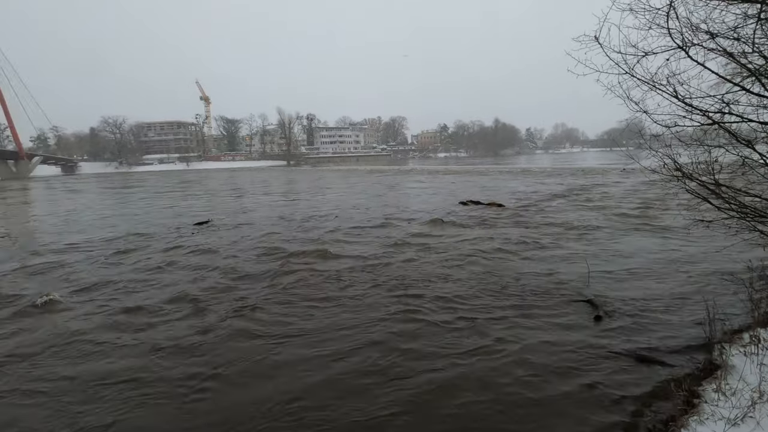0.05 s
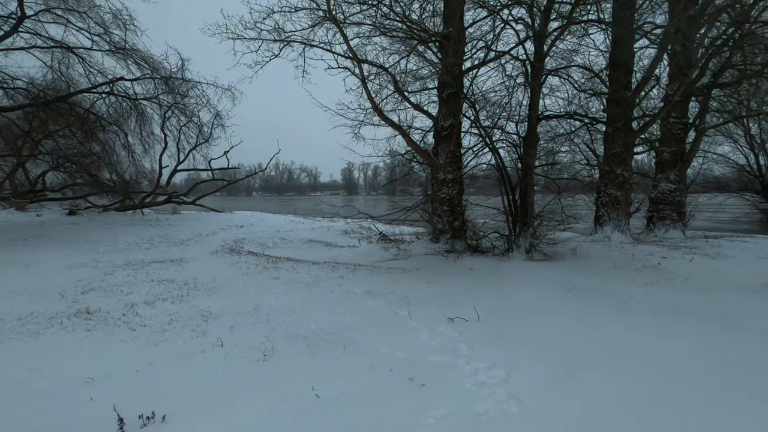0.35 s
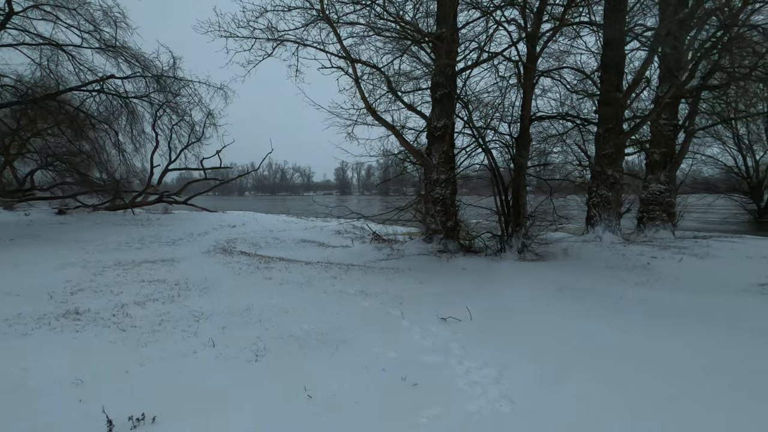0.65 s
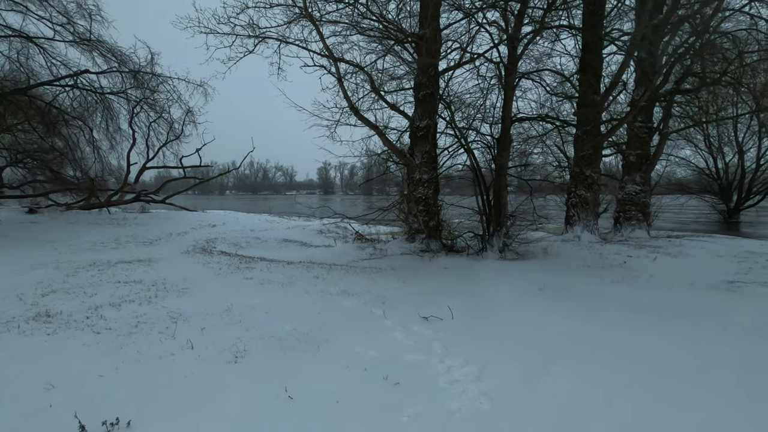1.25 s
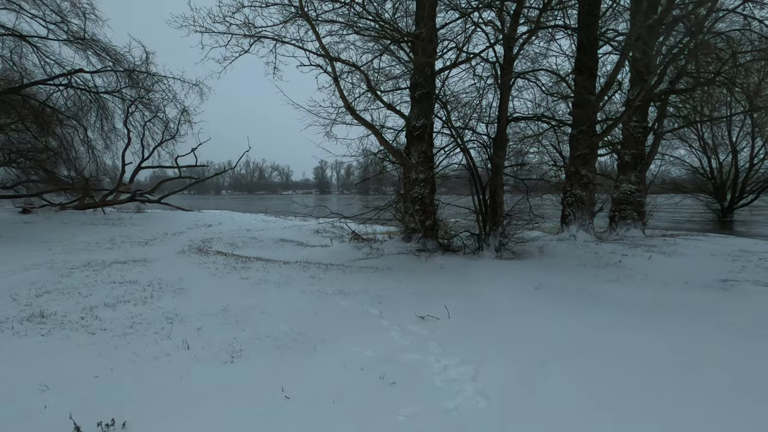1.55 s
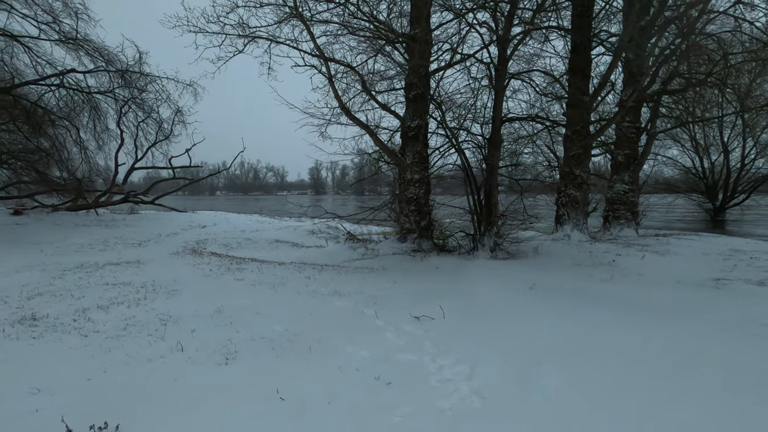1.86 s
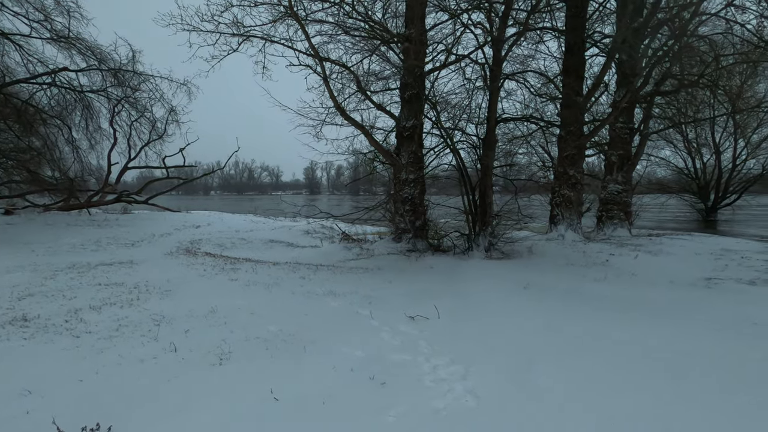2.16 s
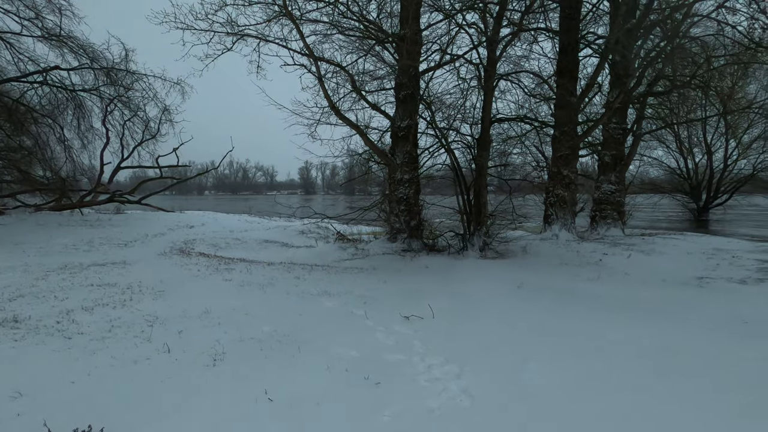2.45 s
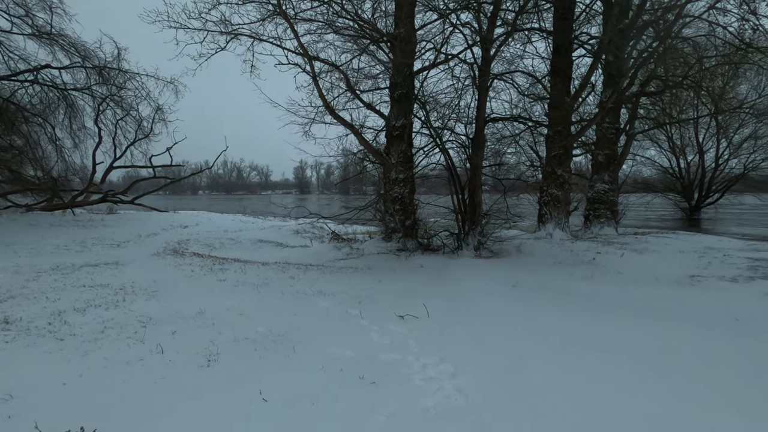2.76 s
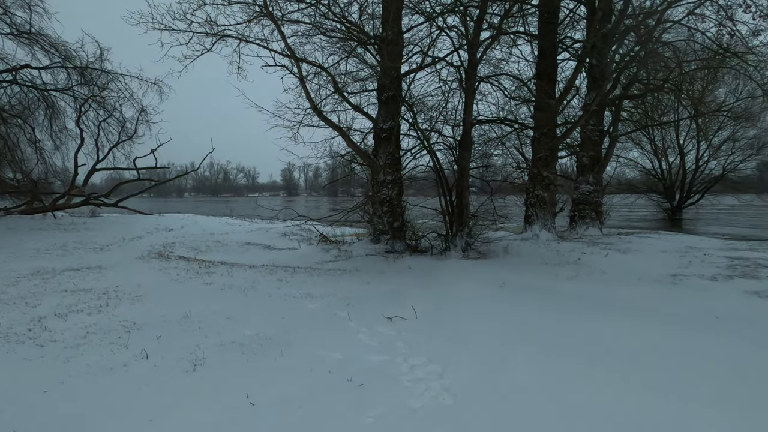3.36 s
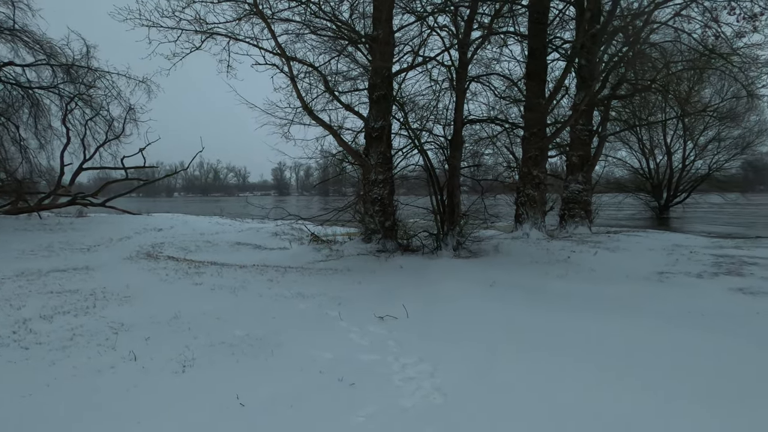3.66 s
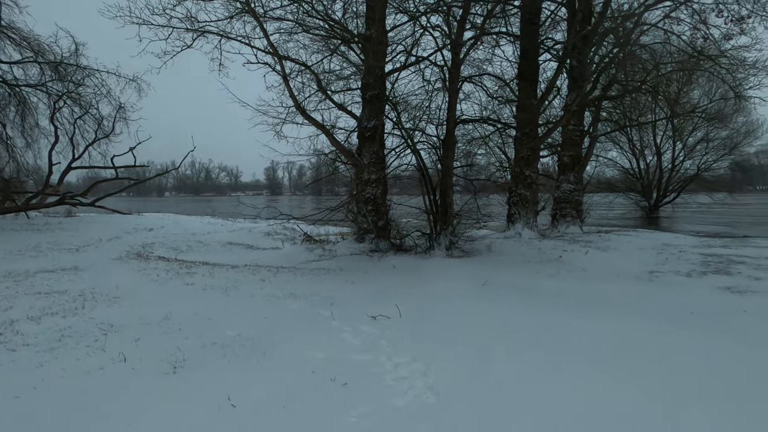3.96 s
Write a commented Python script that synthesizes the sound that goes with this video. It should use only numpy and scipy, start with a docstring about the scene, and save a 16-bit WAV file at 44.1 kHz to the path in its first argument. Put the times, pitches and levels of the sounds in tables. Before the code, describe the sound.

Wind rumbles and thumps on the microphone in an open snowy park. A fluttering gust builds, eases midway, then buffets again, while a distant river hisses faintly underneath with a few tiny ticks and rustles.

```python
"""A snowy park beside a river, the microphone out in gusty wind.
For the first instant water rushes close by; then it is a far hiss under the wind's rumble.
Eddies thump the microphone and flutter faster as a gust builds after one second. The wind eases
around two seconds and buffets again through the last third. Faint ticks and rustles come and go."""
import sys
import numpy as np
from scipy import signal
from scipy.fft import rfft, irfft
from scipy.io import wavfile
from scipy.ndimage import map_coordinates

SR = 44100
rng = np.random.default_rng(int(sys.argv[2]) if len(sys.argv) > 2 else 0)


def output_pcm(signal):
    """Save a mono or channel-first signal as 16-bit PCM at the path in sys.argv[1].

    Samples are clipped to [-1, 1] before scaling.
    """
    pcm = np.clip(np.atleast_2d(signal).T, -1, 1) * 32767
    wavfile.write(sys.argv[1], SR, np.round(pcm).astype(np.int16))


N = 176400
T = np.arange(N) / SR

# Wind pressure on the microphone. Each row: time in seconds, relative level in dB.
RUMBLE_LEVEL = [(0.0, -62), (0.03, -32.5), (0.09, -42), (0.14, -22), (0.4, -28), (0.51, -26), (0.58, -30),
                (0.66, -27.5), (0.84, -28.5), (0.98, -23), (1.27, -21.5), (1.34, -26.5), (1.51, -17),
                (1.56, -27), (1.76, -28), (1.91, -35.5), (2.03, -30.5), (2.1, -34), (2.27, -29.5),
                (2.37, -31.5), (2.42, -39), (2.51, -29), (2.62, -30), (2.69, -19.5), (2.93, -21.5),
                (3.1, -18.5), (3.18, -19), (3.23, -25), (3.28, -19), (3.45, -25.5), (3.56, -18.5),
                (3.77, -20), (4.0, -29)]
# Gust strength, heard as flutter. Each row: time in seconds, relative level in dB.
GUST_LEVEL = [(0, -58), (.12, -52), (.135, -39.5), (.24, -38), (.41, -42), (.46, -54), (.56, -46.5),
              (.63, -52), (.72, -43.5), (.78, -49), (.9, -37.5), (1.03, -44.5), (1.06, -33), (1.2, -31.5),
              (1.28, -34), (1.34, -45), (1.41, -35), (1.46, -34), (1.55, -46), (1.7, -49), (1.88, -58),
              (1.97, -45), (2.09, -52), (2.24, -44), (2.42, -52), (2.52, -46), (2.63, -49.5), (2.7, -40),
              (2.9, -33.5), (2.93, -44.5), (3.0, -45), (3.06, -36.5), (3.21, -50), (3.28, -41), (3.44, -48),
              (3.6, -36), (3.7, -40), (3.83, -43), (4, -51.5)]
# Bursts of churning air. Each row: middle and length in seconds, relative level in dB, pitch in Hz.
BUFFETS = [(.228, 0.065, -27, 185), (0.717, .07, -34, 166), (0.896, 0.032, -26.5, 225),
           (1.057, 0.022, -24.5, 344), (1.094, 0.054, -21.5, 264), (1.16, 0.032, -25.5, 422),
           (1.185, 0.034, -27.5, 540), (1.214, 0.023, -27, 674), (1.274, 0.033, -18, 130),
           (1.41, 0.12, -22, 179), (1.455, 0.03, -28.5, 480), (1.498, .035, -28, 210),
           (1.645, 0.033, -28.5, 141), (1.779, 0.024, -26, 85), (1.96, 0.059, -27.5, 116),
           (2.045, .06, -34, 104), (2.154, 0.056, -31, 125), (2.37, 0.038, -32.5, 128),
           (2.5, 0.056, -32, 160), (2.695, 0.035, -32, 250), (2.759, 0.12, -23.5, 171),
           (2.837, 0.081, -22.5, 245), (2.893, 0.041, -17.5, 252), (3.075, 0.08, -28, 158),
           (3.155, .03, -23.5, 175), (3.308, 0.084, -28, 114), (3.487, 0.019, -30.5, 200),
           (3.522, 0.042, -20, 143), (3.574, 0.025, -24.5, 232), (3.607, 0.036, -35.5, 510),
           (3.638, 0.071, -19, 125), (3.77, 0.15, -25.5, 132)]
# A buffet's spectrum. Each row: multiple of its pitch, relative density in dB.
BUFFET_SPECTRUM = [(.25, -14), (.7, -1), (1.1, 0), (1.6, -13.5), (2.6, -30.5), (5, -50), (14, -94)]
# Hard eddies on the microphone. Each row: middle in seconds, relative level in dB, pitch in Hz.
HARD_EDDIES = [(.129, -8, 316), (0.153, -10, 138), (.209, -8, 126), (.247, -19.5, 403), (0.256, -12.5, 207),
               (0.284, -13.5, 165), (.33, -13, 110), (.36, -13.5, 150), (.415, -24.5, 320),
               (.943, -16.5, 353), (1.057, -14, 240), (1.093, -7, 288), (1.148, -10.5, 363),
               (1.189, -15, 520), (1.264, -12, 267), (1.414, -18, 453), (1.464, -18, 545),
               (1.498, -11.5, 80), (1.642, -17, 207), (1.656, -21.5, 228), (1.725, -17, 65),
               (2.243, -16, 163), (2.759, -14.5, 307), (2.705, -14, 75), (2.797, -13, 100),
               (2.826, -12, 255), (2.895, -8, 272), (3.052, -13, 230), (3.275, -12.5, 70.7),
               (3.633, -16, 218), (3.669, -22.5, 380), (3.707, -15.5, 175), (3.759, -12.5, 263)]
# The river from a distance. Each row: time in seconds, level in dB.
FAR_RIVER_LEVEL = [(0, -51), (.5, -54.5), (1.1, -54), (2, -54.5), (2.8, -55), (3.05, -54.5), (3.5, -55.5),
                   (4, -56.5)]
# Faint ticks. Each row: start in seconds, level in dB, pitch in Hz, bandwidth as a share of the pitch.
TICKS = [(1.443, -55, 4150, .33), (2.695, -64, 7000, .25), (2.951, -59, 3800, 0.41),
         (3.314, -62, 6500, 0.13), (3.333, -62, 6630, .12), (3.367, -57.5, 7000, .11)]
# Soft high rustles. Each row: start and length in seconds, level in dB.
RUSTLES = [(0.085, 0.15, -63.5), (0.593, .08, -66), (0.883, 0.15, -66), (1.023, 0.13, -64),
           (2.435, 0.18, -70), (2.934, 0.17, -63.5), (3.16, .08, -70.5), (3.29, .1, -67)]
# Spectra of wind, water and rustles. Each row: frequency in Hz, relative density in dB.
RUMBLE_SPECTRUM = [(8, -19), (22, -2.5), (42, 1), (62, 2), (90, -2.5), (130, -6), (200, -19), (300, -37.5),
                   (500, -53.5), (1000, -81)]
FLUTTER_SPECTRUM = [(60, -23), (140, 0), (220, -1), (310, -5.5), (430, -14.5), (700, -21.5), (1000, -29),
                    (1600, -45), (3000, -62), (6000, -87.5)]
NEAR_RIVER_SPECTRUM = [(59, -57), (100, -25), (164, -19), (206, 3.5), (270, -12), (443, -5.5), (759, -8),
                       (972, -11), (1300, -17), (3730, -32.5), (14000, -67)]
FAR_RIVER_SPECTRUM = [(100, -1), (400, -4.5), (700, -2), (1000, -3), (1400, -0.5), (2000, -7),
                      (3000, -11.5), (5000, -17.5), (6500, -20), (7500, -19.5), (9000, -28.5), (11000, -35),
                      (13000, -61.5)]
RUSTLE_SPECTRUM = [(1000, -25), (3000, 7), (7500, 1.5), (10000, -9.5), (12000, -18.5), (14000, -33.5)]

RUMBLE_TRIM_DB, FLUTTER_TRIM_DB, BUFFET_TRIM_DB, EDDY_TRIM_DB = -0.5, 1.5, -1, -2.85
RUMBLE_FLICKER_DB, GUST_FLICKER_DB = 1.97, 3.5
STRONG_GUST_DB, OCTAVES_PER_DB = -32, 0.02
NEAR_END_S, NEAR_FADE_S, NEAR_DB = 0.13, 0.0083, -34
EDDY_SKEW, TICK_RISE_S = 0.95, 0.0024
OVERLOAD_CEILING, LOWPASS_HZ = 0.39, 12715


def wind_rumble():
    """Large slow eddies press right on the microphone."""
    pressure = steadied(noise(RUMBLE_SPECTRUM), hz=15)
    return pressure * amp(curve(RUMBLE_LEVEL) + RUMBLE_TRIM_DB + RUMBLE_FLICKER_DB * wander(hz=17))


def wind_flutter():
    """Small eddies cross the microphone at the speed of the gust: faster is louder and brighter."""
    gust_db = curve(GUST_LEVEL) + GUST_FLICKER_DB * steadied(wander(hz=24.15), hz=4.06)
    speed = 2 ** np.clip(OCTAVES_PER_DB * (gust_db - STRONG_GUST_DB), -2, 1)
    air = steadied(noise(FLUTTER_SPECTRUM), hz=4.6)
    passing_air = map_coordinates(air, [np.cumsum(speed)], order=3, mode="mirror")
    return passing_air * amp(gust_db + FLUTTER_TRIM_DB)


def wind_buffets():
    """Churning air hits the microphone in brief bursts that swell and die."""
    out = np.zeros(N)
    for middle, length, db, hz in BUFFETS:
        churn = noise([(k * hz, level) for k, level in BUFFET_SPECTRUM], size=8192)
        t = (np.arange(len(churn)) - len(churn) / 2) / SR
        swell = np.maximum(np.cos(np.pi * np.clip(t / length, -.5, .5)), 0) ** 0.78
        burst = unit(churn * swell) * np.sqrt(np.mean(swell ** 2))
        add(out, middle + t[0], amp(db + BUFFET_TRIM_DB) * burst)
    return out


def eddy_thumps():
    """A hard eddy strikes the microphone as one lopsided swing of pressure."""
    out, t = np.zeros(N), np.arange(-SR // 20, SR // 20) / SR
    for middle, db, hz in HARD_EDDIES:
        phase = np.pi * hz * t
        swing = (1 - 2 * np.tanh(phase) ** 2 - EDDY_SKEW * np.tanh(phase)) / np.cosh(phase)
        add(out, middle + t[0], amp(db + EDDY_TRIM_DB) * swing)
    return out


def river():
    """Water rushes close to the microphone, then gives way to a steady hiss in the distance."""
    fade = np.exp(-np.maximum(T - NEAR_END_S, 0) / NEAR_FADE_S)
    near = amp(NEAR_DB) * fade * noise(NEAR_RIVER_SPECTRUM)
    far = amp(curve(FAR_RIVER_LEVEL) + 0.7 * wander(hz=25)) * noise(FAR_RIVER_SPECTRUM)
    return near + far


def ticks():
    """Short dry snaps of high noise, faint behind the wind."""
    out, t = np.zeros(N), np.arange(SR // 20) / SR
    snap = t / TICK_RISE_S * np.exp(1 - t / TICK_RISE_S)
    freqs = np.fft.rfftfreq(len(t), 1 / SR)
    for start, db, hz, width in TICKS:
        band = np.exp(-.5 * (np.log((freqs + 1) / hz) / width) ** 2)
        hiss = unit(irfft(rfft(rng.standard_normal(len(t))) * band, len(t)))
        add(out, start, amp(db) * snap * hiss)
    return out


def rustles():
    """Soft swells of grainy hiss in the background."""
    swell = np.zeros(N)
    for start, length, db in RUSTLES:
        add(swell, start, amp(db) * np.hanning(int(length * SR)) ** .5)
    return swell * unit(noise(RUSTLE_SPECTRUM) * amp(1.5 * wander(hz=200)))


def amp(db):
    """Decibels to gain."""
    return 10 ** (np.asarray(db) / 20)


def unit(x):
    """Scales to rms 1."""
    return x / np.sqrt(np.mean(x ** 2) + 1e-20)


def curve(points):
    """Joins rows of seconds and value by straight lines."""
    return np.interp(T, *np.transpose(points))


def add(mix, start, sound):
    """Mixes a sound in at a start in seconds."""
    part = mix[max(round(start * SR), 0):][:len(sound)]
    part += sound[:len(part)]


def noise(spectrum, size=N):
    """Noise of rms 1, shaped by rows of Hz and dB."""
    hz, db = np.transpose(spectrum)
    freqs = np.fft.rfftfreq(size, 1 / SR)
    gain = amp(np.interp(np.log(freqs + 1), np.log(hz + 1), db))
    return unit(irfft(rfft(rng.standard_normal(size)) * gain, size))


def smooth(x, hz):
    """Keeps what moves slower than hz."""
    return irfft(rfft(x) * np.exp(-(np.fft.rfftfreq(N, 1 / SR) / hz) ** 2), N)


def wander(hz):
    """Random drift of rms 1, slower than hz."""
    return unit(smooth(rng.standard_normal(N), hz))


def steadied(x, hz):
    """Evens out the slow swells of a noise."""
    return x / np.sqrt(abs(smooth(x ** 2, hz)) + 0.0017)


def scene():
    """One microphone in the park: wind right on it, the river behind."""
    wind = wind_rumble() + wind_flutter() + wind_buffets() + eddy_thumps()
    return (wind + river() + ticks() + rustles())[None]


def record(dry):
    """The strongest swings overload softly, the ends fade quickly and the top treble is cut."""
    rounded = dry / (1 + (dry / OVERLOAD_CEILING) ** 4) ** (1 / 4)
    to_nearest_end = np.minimum(T, T[::-1])
    fade = np.sin(np.pi / 2 * np.minimum(to_nearest_end / .004, 1)) ** 2
    padded = np.pad(rounded * fade, ((0, 0), (255, 255)), "edge")
    lowpass = signal.firwin(511, LOWPASS_HZ, window=("kaiser", 9), fs=SR)
    return signal.oaconvolve(padded, lowpass[None], "valid")


dry = scene()
out = record(dry)
output_pcm(out)
```